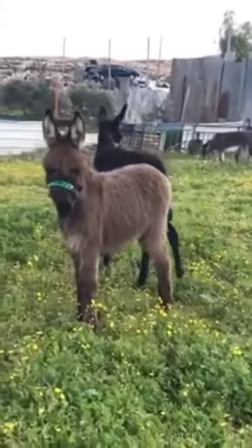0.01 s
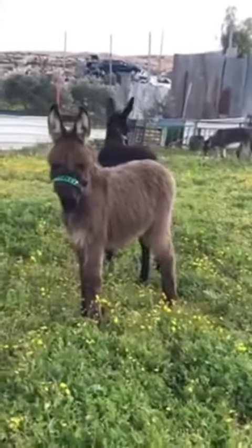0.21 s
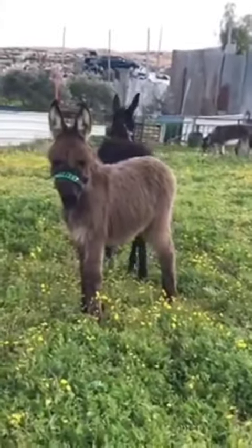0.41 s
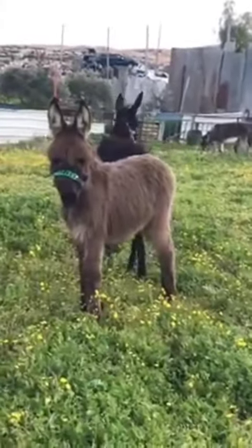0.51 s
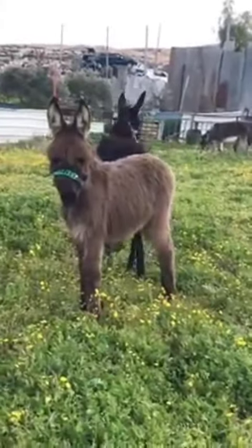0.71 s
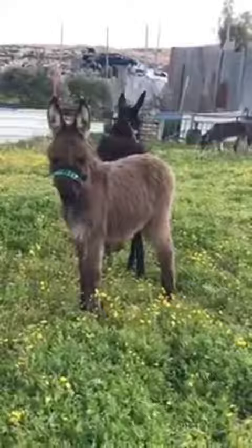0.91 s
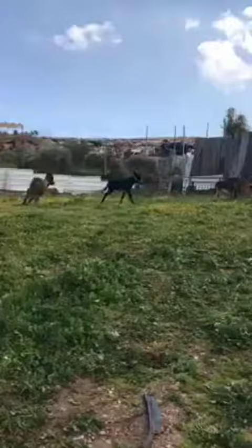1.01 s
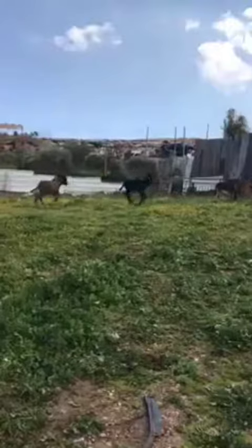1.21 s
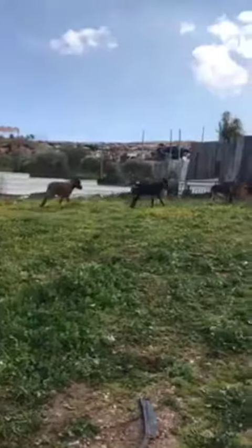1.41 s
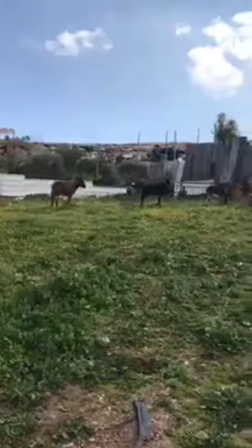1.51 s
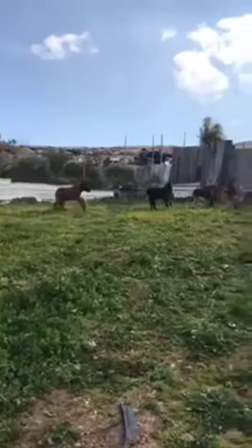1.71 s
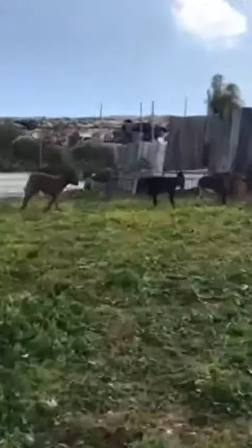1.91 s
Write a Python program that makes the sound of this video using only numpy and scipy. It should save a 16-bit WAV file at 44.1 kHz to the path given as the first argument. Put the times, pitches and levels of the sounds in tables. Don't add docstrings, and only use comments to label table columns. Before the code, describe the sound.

A donkey bray, close and outdoors: a faint far whine opens, then from about 0.15 s a slow pulsing growl builds, jumping to a loud hoarse breathy haw near 0.47 s and a raspy squeal at 0.56 s. It cuts off at 0.66 s with a tiny fading stutter. Silence until 1.25 s, then a dull, quickly clearing quiet field: wavering distant whines with echoes, a slight grass rustle near 1.7 s, and low machinery rumble to the end.

```python
import sys
import numpy as np
from scipy import signal
from scipy.io import wavfile
from scipy.ndimage import uniform_filter1d

SR = 44100
rng = np.random.default_rng(int(sys.argv[2]) if len(sys.argv) > 2 else 0)


def attenuation_scalar(level_db):
    decades = np.asarray(level_db, float) / 20
    return 10 ** decades


def digitize_waveform(pressure):
    field = np.atleast_2d(pressure).T
    bounded = np.clip(field, -1, 1)
    quanta = np.round(bounded * 32767).astype(np.int16)
    wavfile.write(sys.argv[1], SR, quanta)


N = 88200
T = np.arange(N) / SR


def unit_rms(x):
    return x / np.sqrt(np.mean(x ** 2) + 1e-20)


def curve(table, column):
    rows = np.array(table, float)
    return np.interp(T, rows[:, 0], rows[:, column])


def gain(table, column):
    inside = np.minimum(T - table[0][0] + .004, table[-1][0] - T + .004)
    return attenuation_scalar(curve(table, column)) * np.clip(inside / .004, 0, 1)


def wobble(hz):
    b, a = signal.butter(2, hz, fs=SR)
    return unit_rms(signal.lfilter(b, a, rng.standard_normal(N)))


def resonate(x, hz, width_hz):
    turn = np.exp(2j * np.pi * np.cumsum(hz * np.ones(N)) / SR)
    r = np.exp(-np.pi * width_hz / SR)
    return 2 * (turn * signal.lfilter([1 - r], [1, -r], x / turn)).real


def tube(x, modes):
    out = np.zeros(N)
    for k, (hz, width_hz, db) in enumerate(modes):
        formant = resonate(resonate(x, hz, 2.0 * width_hz), hz, 1.8 * width_hz)
        out += (-1) ** k * attenuation_scalar(db) * formant / np.sqrt(width_hz)
    return unit_rms(out)


def partials(table, orders, jitter, shimmer_db, shimmer_hz):
    turns = np.cumsum(curve(table, 1) * (1 + jitter * wobble(76.4))) / SR
    tones = np.zeros(N)
    for order, db in orders:
        shimmer = attenuation_scalar(db + shimmer_db * wobble(shimmer_hz))
        tones += shimmer * np.cos(2 * np.pi * (round(order) * turns + rng.random()))
    return np.sqrt(2) * tones * gain(table, 2), turns


def field(spectrum, db, patchy_db):
    gust_s, gust_db = 1.68, 4
    frames = N // 256 + 5
    hz = np.fft.rfftfreq(1024, 1 / SR)
    column_hz = hz[:, None]
    a, b, patches = rng.standard_normal((frames, 513, 3)).T
    patches = uniform_filter1d(patches, size=10, axis=0)
    patches = unit_rms(uniform_filter1d(patches, size=12, axis=1))
    f, density_db = np.transpose(spectrum)
    shape_db = np.interp(np.log(hz + 1), np.log(f + 1), density_db)[:, None]
    z = (a + 1j * b) * attenuation_scalar(shape_db + patchy_db * patches * (column_hz < 3000))
    gust = np.exp(-((np.arange(frames) * 256 / SR - gust_s) / 0.03) ** 2)
    rustle_db = gust_db * gust * (column_hz > 2300)
    notch_db = 7 * np.exp(-((column_hz - 8300) / 350) ** 2)
    z = z * attenuation_scalar(rustle_db - notch_db - 6.5 * (column_hz > 12000))
    return attenuation_scalar(db) * unit_rms(signal.istft(z, nperseg=1024, noverlap=768)[1][:N])


def far_overtones():
    # (start t/s, length t/s, f/Hz, level/dB)
    bands = [(1.39, 0.051, 2480, -72.5), (1.611, .075, 2850, -78), (1.714, 0.056, 3540, -73),
             (1.78, 0.046, 3560, -79), (1.862, 0.015, 2030, -60), (1.9, 0.013, 2060, -64),
             (1.87, 0.082, 1380, -67.5), (2.2, 0.086, 3190, -77), (1.94, 0.058, 3300, -80.5),
             (-.03, 0.13, 1970, -76)]
    out = np.zeros(N)
    for start, length, hz, db in bands:
        swell = np.sin(np.pi * np.clip((T - start) / length, 0, 1)) ** .5
        phase = 2 * np.pi * np.cumsum(hz * (1 + .006 * wobble(150))) / SR
        out += attenuation_scalar(db + .8 * wobble(50)) * np.sqrt(2) * swell * np.sin(phase)
    return out


def far_whines():
    # (t/s, f/Hz, tone level/dB, octave level/dB)
    early_calls = [
        [(0, 647.6, -54, -62.5), (.05, 672, -52.5, -83), (.075, 653.5, -105, -59), (.105, 646, -48.5, -63.5),
         (.16, 644, -99, -78), (.26, 641, -61, -62)],
        [(1.288, 721, -78, -75), (1.293, 736, -51.5, -66), (1.3, 696, -54, -73)],
        [(1.4, 729, -76, -70), (1.435, 736, -78, -65.5), (1.45, 736, -77, -60)],
    ]
    # (t/s, f/Hz, tone level/dB, octave level/dB)
    later_calls = [
        [(1.33, 687, -57, -73), (1.343, 708.3, -53.5, -77), (1.385, 757, -52, -99), (1.405, 849, -64, -80),
         (1.45, 830, -54, -70), (1.47, 750, -56, -87), (1.485, 760, -75, -78)],
        [(1.39, 843, -65, -73), (1.46, 823, -79, -60), (1.52, 829, -77, -61), (1.6, 817, -67, -76)],
        [(1.595, 762.6, -55, -87), (1.606, 848, -55, -69), (1.622, 938, -60, -67), (1.655, 943, -57, -62),
         (1.672, 869, -53, -62), (1.69, 760, -56, -72)],
        [(1.65, 938, -80, -77), (1.69, 950, -90, -55), (1.72, 920, -90, -64), (1.76, 880, -85, -75)],
        [(1.705, 750, -86, -78), (1.712, 763, -43.5, -74), (1.722, 876.4, -54.5, -60.5),
         (1.782, 898, -55.5, -60.5), (1.81, 873, -62, -63), (1.838, 941, -54, -57.5),
         (1.875, 898, -54.5, -59.5), (1.92, 921, -56.5, -60), (2, 869, -53.5, -55)],
    ]
    out = np.zeros(N)
    for call in early_calls + later_calls:
        phase = 2 * np.pi * np.cumsum(curve(call, 1) * (1 + .008 * wobble(120))) / SR
        tone = gain(call, 2) * attenuation_scalar(1.8 * wobble(60)) * np.sin(phase)
        octave = gain(call, 3) * (.9 + .35 * wobble(70)) * np.sin(2 * phase)
        out += np.sqrt(2) * (tone + octave)
    out += far_overtones()
    t = T[:8000]
    tail = rng.standard_normal(len(t)) * attenuation_scalar(-60 * t / .3) * (t > .012)
    return out + attenuation_scalar(-11) * signal.fftconvolve(out, tail / np.linalg.norm(tail))[:N]


def lower_voice():
    # (t/s, f/Hz, level/dB)
    voices = [
        [(.05, 190.7, -62), (.09, 187, -45), (.13, 187, -59.5)],
        [(.56, 350, -48), (.575, 354, -37.5), (.59, 345.5, -43), (.6, 356, -53)],
        [(.6, 197, -51), (.625, 202.5, -46), (.645, 208.8, -42), (.66, 208.3, -45.5)],
    ]
    # (multiple, level/dB)
    voice_orders = [
        [(1, -2.5)],
        [(1, -0.5)],
        [(2, 0), (3, -1.5), (4, -7), (5, -9.5)],
    ]
    return sum(partials(table, orders, jitter=.01, shimmer_db=2.5, shimmer_hz=60)[0]
               for table, orders in zip(voices, voice_orders))


def growl():
    # (t/s, f/Hz, chest level/dB, slap level/dB, puff level/dB)
    pulses = [(.13, 79, -50.5, -77.5, -104), (.18, 70.4, -40.5, -73, -102), (.22, 45.8, -41, -60.5, -54),
              (.28, 48.96, -38.5, -61, -59), (.31, 55.8, -45.5, -49, -58), (.34, 60.1, -32.5, -43, -67),
              (.374, 63.1, -39.5, -44, -67.5), (.388, 85.3, -39.5, -39.5, -66.5),
              (.47, 98.1, -33, -43, -61)]
    # (f/Hz, width f/Hz, level/dB)
    slap_ring = [(587, 97, 1), (453, 219, -4), (1050, 330, -21.5)]
    # (f/Hz, width f/Hz, level/dB)
    puff_ring = [(1564, 120, -3.5), (2084, 59, -7), (1060, 127.7, -5.5), (3420, 200, -19), (4162, 250, -20),
                 (5957, 520, -23)]
    # (t/s, extra puff level/dB)
    accents = [(0.209, 8), (.236, 0), (.28, 15), (.331, 10), (0.348, 9.5), (.394, 10.5), (0.431, 0),
               (.452, 5.5)]
    slap_at_s = .3315
    chest_hz, chest_width_hz, chest_db = 173.5, 36, -5
    mouth_opens_s, mouth_db = .388, 10.5

    hz = curve(pulses, 1)
    turns = np.cumsum(hz * (1 + 0.004 * wobble(40))) / SR
    turns = turns - turns[round(slap_at_s * SR)]

    chest = np.sin(2 * np.pi * turns - .7)
    chest_opens = np.clip((T - .24) / .08, .1, 1)
    for k in (2, 3, 4):
        resonance = .85 / (1 + ((k * hz - chest_hz) / chest_width_hz) ** 2) * chest_opens
        lift = attenuation_scalar(chest_db + 2 * wobble(30)) * (.45 / k + resonance)
        chest += lift * np.sin(2 * np.pi * k * turns - 3.6)

    clicks = attenuation_scalar(1.2 * rng.standard_normal(N)) * (np.diff(np.floor(turns), prepend=0) > 0)
    slaps = uniform_filter1d(uniform_filter1d(clicks, size=18), size=18)
    part = (turns + .16) % 1
    puffs = part * np.exp(-part / 0.19) * rng.standard_normal(N) * attenuation_scalar(0.47 * wobble(25))
    ring = tube(unit_rms(slaps) + .22 * unit_rms(puffs), slap_ring)
    ring = ring / np.sqrt(abs(uniform_filter1d(ring ** 2, size=3000)) + 1e-6)

    sharp_slaps = uniform_filter1d(clicks, size=9) * gain(pulses, 3)
    drive = unit_rms(puffs) + 0.5 * unit_rms(sharp_slaps)
    cycle = np.floor(turns + .16).astype(int) % 200
    accent_db = sum(db * np.exp(-((T - s - .002) / 0.0031) ** 2) for s, db in accents)
    colour_db = 2.2 * rng.standard_normal((200, len(puff_ring)))[cycle].T
    mouth_lift_db = mouth_db * (T > mouth_opens_s) + .5 * accent_db
    colour_db[[0, 2]] = .4 * colour_db[[0, 2]] + [accent_db, mouth_lift_db]
    colour_db[3:] += .4 * accent_db
    air = np.zeros(N)
    for k, mode in enumerate(puff_ring):
        colour = attenuation_scalar(uniform_filter1d(colour_db[k], size=130))
        air += (-1) ** k * attenuation_scalar(mode[2]) * tube(drive, [mode]) * colour
    return np.sqrt(2) * chest * gain(pulses, 2) + ring * gain(pulses, 3) + air * gain(pulses, 4)


def breath(turns):
    # (t/s, breath level/dB, hiss level/dB)
    flow = [(.19, -86.5, -77), (.38, -53, -69.5), (.455, -48, -60.5), (.48, -35.5, -52.5),
            (.53, -34.5, -44), (.56, -32.5, -46), (.6, -39, -44), (.63, -43, -44.5), (.66, -38.5, -44)]
    # (f/Hz, width f/Hz, level/dB)
    throat = [(536, 150, -1), (737, 300, 1.5), (384.3, 310, -6), (1028, 560, -9), (1535, 82, -4.5),
              (109, 37, -15.5)]
    # (f/Hz, width f/Hz, level/dB)
    upper_throat = [(2078, 140, 3), (2484, 56, 3), (3057, 170, 1), (3510, 100, -2), (3960, 130, -2),
                    (4440, 75, -6.5), (5550, 557, -14.5), (6440, 270, -24.5), (6760, 500, -23.5),
                    (8900, 690, -31)]
    rasp = (.5 + np.exp(-(turns % 1) / .3)) * rng.standard_normal(N) * attenuation_scalar(.8 * wobble(60))
    air = tube(rasp, throat) * gain(flow, 1) + tube(rasp, upper_throat) * gain(flow, 2)
    air = air + 1.2 * np.clip((T - .61) / 0.026, 0, 1) * resonate(air, 9300, 1500)
    air = air + 1.2 * np.exp(-((T - .49) / .04) ** 2) * resonate(air, 5550, 600)
    rising_hz = np.interp(T, (.5, .55), (6050, 6600))
    for hz, width_hz in ((2770, 160), (4900, 300), (rising_hz, 300)):
        air = air - .97 * resonate(air, hz, width_hz)
    return signal.sosfilt(signal.butter(8, 10300, fs=SR, output="sos"), air)


def haw():
    # (t/s, f/Hz, level/dB)
    voice = [(.455, 164, -52.5), (.47, 164.8, -38), (.48, 166.9, -32), (.5, 182, -30), (.51, 188, -34),
             (.548, 189.3, -33.5), (.562, 190.5, -47.5), (.575, 188.3, -48)]
    # (multiple, level/dB)
    voice_orders = [(2, -13), (4, 2.5), (5, -16.5), (8, -23)]
    # (t/s, f/Hz, overtone level/dB, tone level/dB)
    lagging = [(.455, 161.5, -46.5, -55.5), (.476, 163.9, -37, -39), (.492, 170.7, -35, -31),
               (.52, 179.8, -39.5, -30.5), (.538, 178.2, -29, -43), (.55, 187.6, -49.5, -50),
               (.57, 187, -54.5, -69.5)]
    sound, turns = partials(voice, voice_orders, jitter=.011, shimmer_db=2.2, shimmer_hz=90)
    third, low_turns = partials(lagging, [(3, 0), (6, -11)], jitter=.008, shimmer_db=1.5, shimmer_hz=80)
    tone = np.sqrt(2) * np.sin(2 * np.pi * .96 * low_turns) * gain(lagging, 3)
    return sound + third + tone, turns


def squeal():
    # (t/s, f/Hz, level/dB)
    high_voice = [(.56, 342, -48), (.572, 349, -36), (.6, 364, -39), (.625, 378, -39), (.66, 386, -46)]
    # (multiple, level/dB)
    high_orders = [(2, -16), (3, -19), (4, 0)]
    return partials(high_voice, high_orders, jitter=.008, shimmer_db=2.2, shimmer_hz=90)[0]


def bray():
    voice, turns = haw()
    return lower_voice() + growl() + breath(turns) + voice + squeal()


def rumble():
    hz, width_hz = 55.4, 10.8
    x = resonate(rng.standard_normal(N), hz, width_hz)
    swell_db = 2 * np.sin(2 * np.pi * (T - 1.4) / 0.29)
    return attenuation_scalar(-49 + swell_db) * unit_rms(resonate(x, hz, 2 * width_hz))


def first_view(far):
    # (f/Hz, level/dB per Hz)
    air_spectrum = [(24, -38), (55, 4.5), (190, -14), (600, -23), (1400, -31), (2300, -43), (7500, -50.5),
                    (15500, -61)]
    grain_levels = (-16.5, -41.5, -71)
    cut_s, grain_s = .6572, .0108
    first = bray() + far + field(air_spectrum, -48.0, patchy_db=3.5)
    cut, step = round(cut_s * SR), round(grain_s * SR)
    out = first * np.clip((cut_s - T) / 0.00093, 0, 1)
    soft = uniform_filter1d(first, size=7)
    for k, db in enumerate(grain_levels):
        grain = soft[cut - step * (k + 1):cut - step * k]
        out[cut + k * step:cut + (k + 1) * step] = attenuation_scalar(db) * signal.windows.tukey(step, .25) * grain
    return out


def second_view(far):
    # (f/Hz, level/dB per Hz)
    air_spectrum = [(24, -26), (60, -2), (280, -15.5), (1000, -19.5), (1750, -30), (2300, -37.5),
                    (7500, -49.5), (15500, -59)]
    open_s, join_s, join_db, fade_s = 1.2464, 1.3, -16, 0.0395
    second = far + field(air_spectrum, -52.0, patchy_db=-0.94) + rumble()
    lowpass = signal.ellip(8, 1, 50, 6700, fs=SR, output="sos")
    dull = signal.sosfilt(lowpass, second - 0.36 * resonate(second, 62, 70))
    thump = 1.48 * resonate(dull, 250, 132) * np.exp(-abs(T - open_s) / 0.033) * 2.58
    lead = attenuation_scalar(-2.5) * (dull + thump + .5 * resonate(dull, 760, 510))
    out = lead * (T >= open_s) * np.clip((join_s - T) / .003, 0, 1)
    fade = attenuation_scalar(join_db * np.clip(1 - (T - join_s) / fade_s, 0, 1))
    out += second * (T >= join_s) * fade * np.clip((T - join_s) / 0.0058, 0, 1)
    out[round(open_s * SR)] -= attenuation_scalar(-50)
    return out


def scene():
    far = far_whines()
    return (first_view(far) + second_view(far))[None]


def top_cut(x):
    return signal.sosfilt(signal.butter(12, 15720, fs=SR, output="sos"), x)


def record(dry):
    return top_cut(dry)


dry = scene()
out = record(dry)
digitize_waveform(out)
```